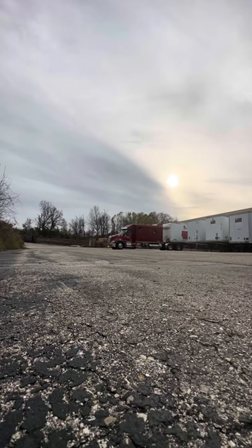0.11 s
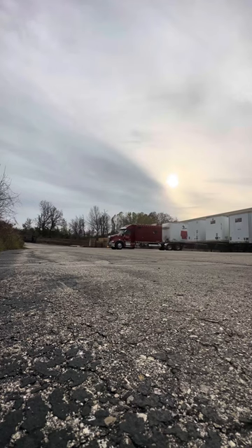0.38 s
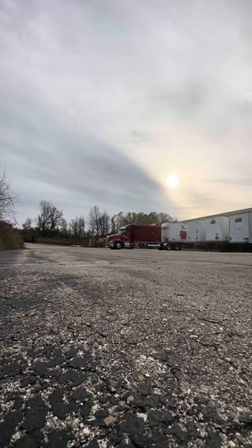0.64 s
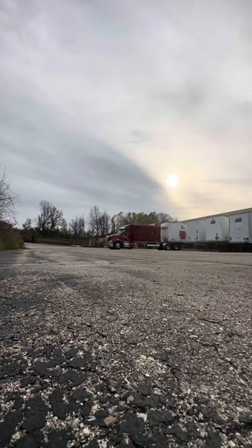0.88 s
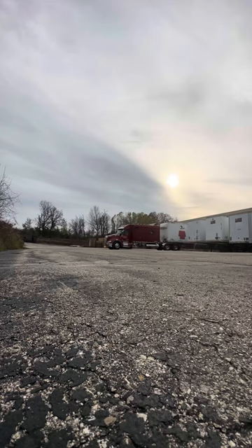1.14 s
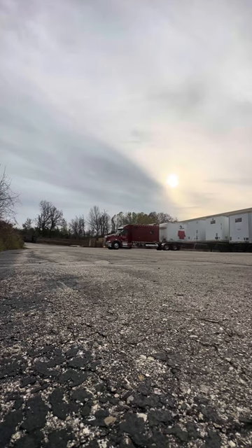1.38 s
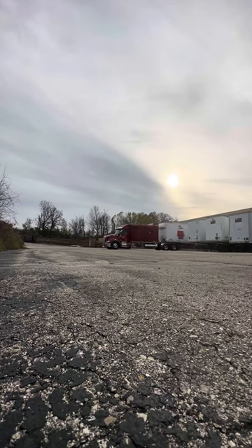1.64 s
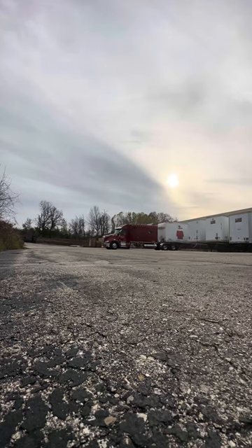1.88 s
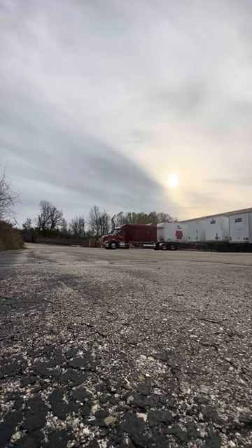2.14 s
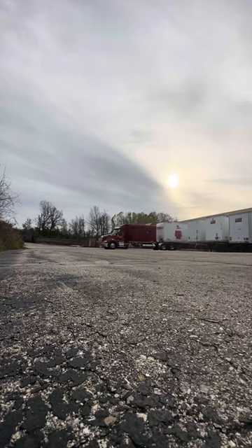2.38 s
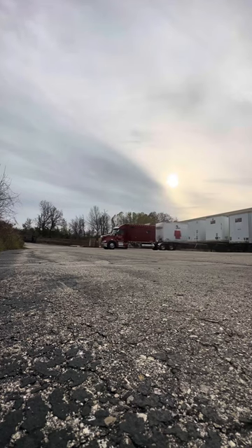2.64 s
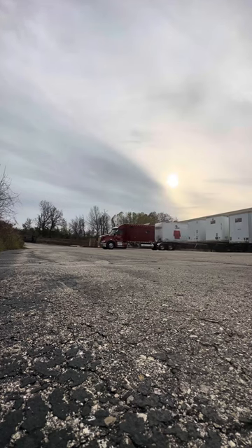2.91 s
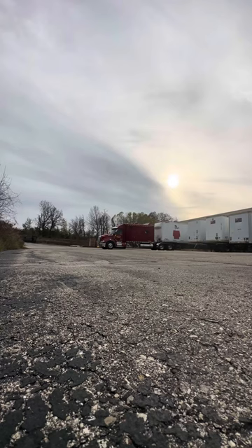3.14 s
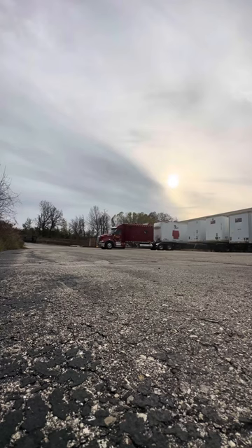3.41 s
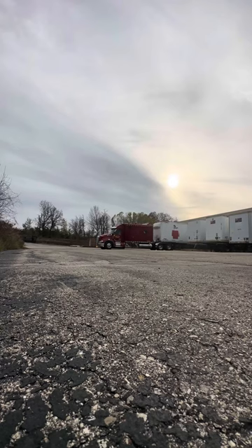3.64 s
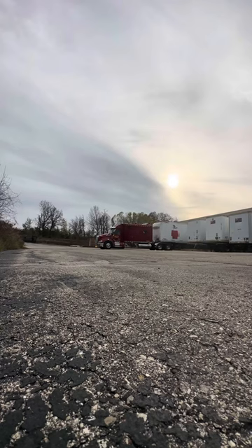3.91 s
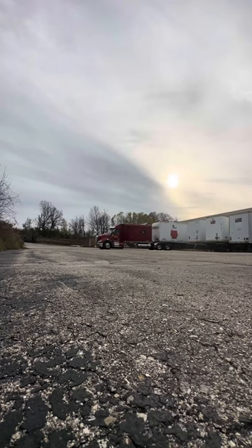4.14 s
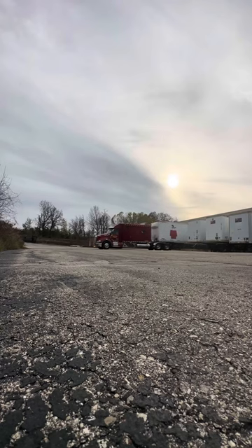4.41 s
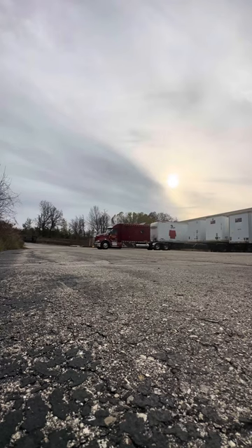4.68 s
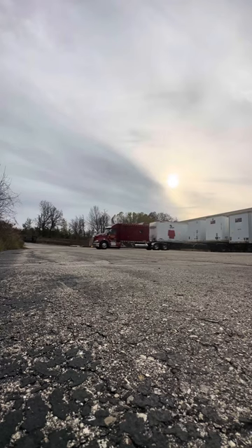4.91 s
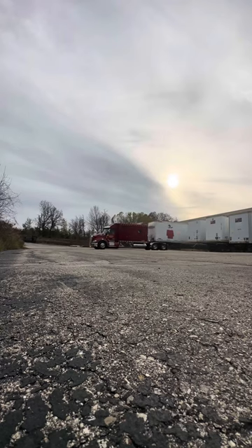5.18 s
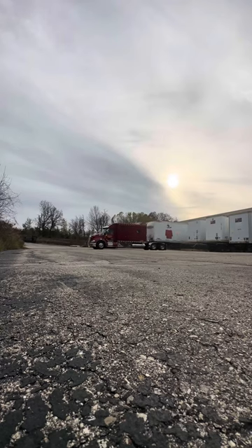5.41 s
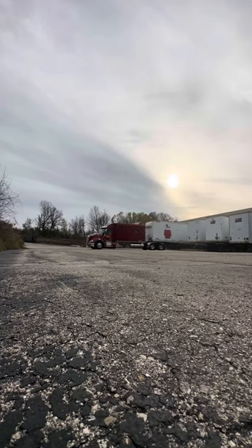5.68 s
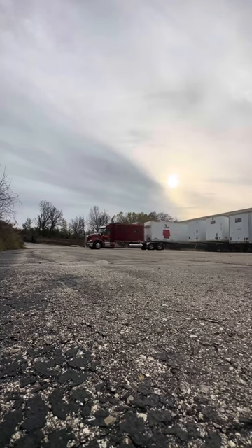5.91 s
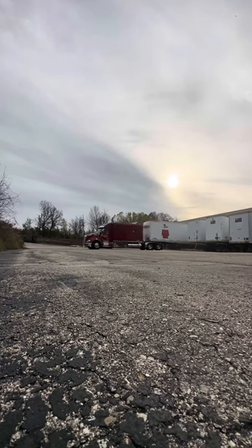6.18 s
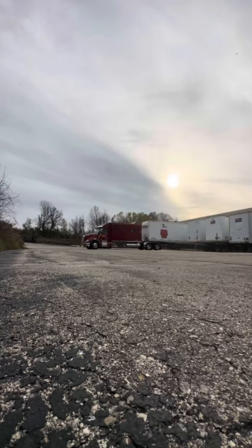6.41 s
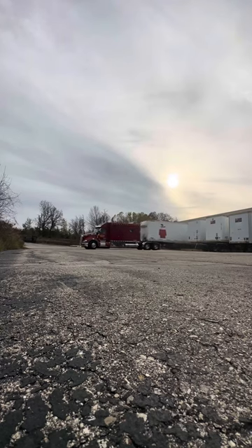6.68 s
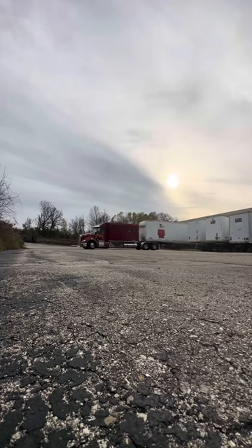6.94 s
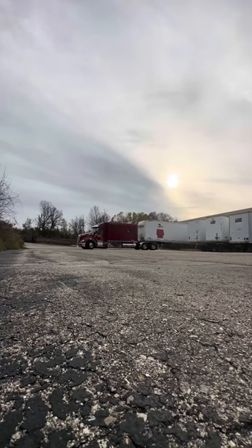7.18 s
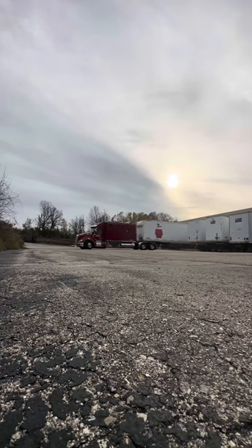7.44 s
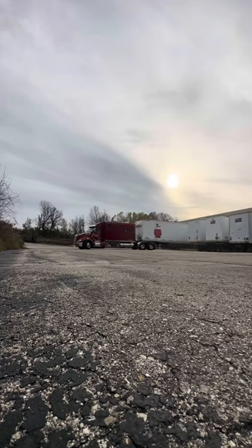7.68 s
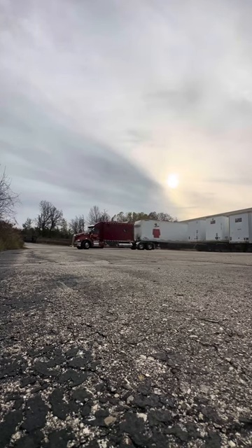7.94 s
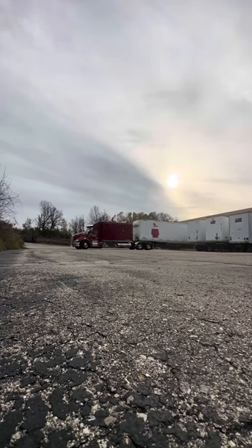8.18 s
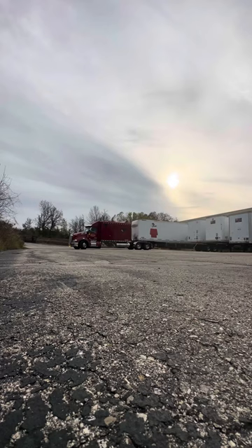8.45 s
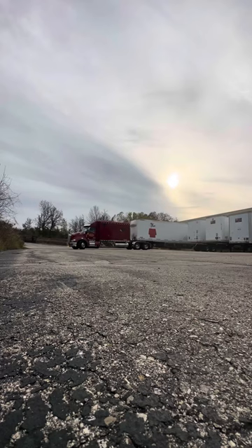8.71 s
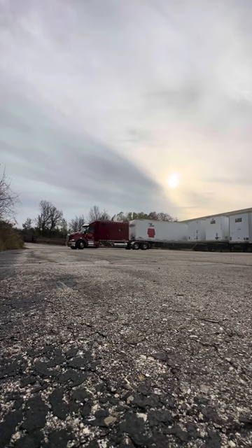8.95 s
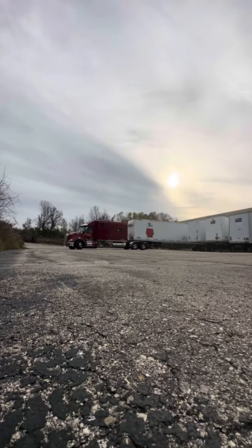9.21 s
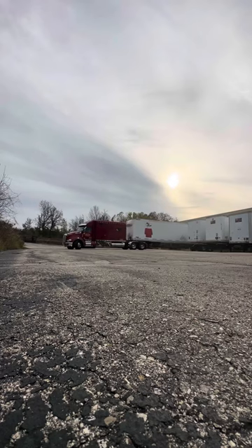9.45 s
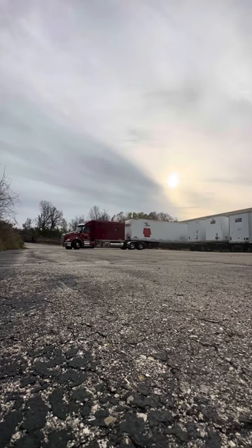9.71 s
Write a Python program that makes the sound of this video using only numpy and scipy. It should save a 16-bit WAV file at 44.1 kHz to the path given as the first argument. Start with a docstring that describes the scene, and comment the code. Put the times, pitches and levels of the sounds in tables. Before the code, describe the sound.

A continuous low diesel throb with compressor puffs, fan hum, knocking clatter and soft hiss comes from a slow truck. After a steady first half the engine lugs, revs up, eases and rises again, the roar ending louder and the clatter duller. Bright bird chips sit to the right, sliding chirps to the left, with a short wing flutter past midway. Open lot, low phone microphone.

```python
"""A deep diesel throb, a clattering engine and a broad roar that ends louder than it began: a heavy truck creeps
across a wide lot toward a phone near the ground. Small birds call from the bushes and wings flutter briefly.
One engine speed drives sines for exhaust and fan, ringing compressor puffs and the combustion knock;
the roar, clatter and hiss are shaped noise, and the birds are gliding sines with a smeared echo."""
import sys
import numpy as np
from scipy import signal
from scipy.fft import rfft, irfft, next_fast_len
from scipy.io import wavfile
from scipy.ndimage import uniform_filter1d, map_coordinates

SR = 44100
rng = np.random.default_rng(int(sys.argv[2]) if len(sys.argv) > 2 else 0)


def elevation(decibels):
    """Turn decibel levels (scalar or array-like) into linear amplitude ratios."""
    levels = np.asarray(decibels, float)
    return 10 ** (levels / 20)


def inscribe(sig):
    """Save sig as 16-bit PCM at rate SR to the path in sys.argv[1].

    A 1-D sig is mono; a 2-D sig holds one channel per row.
    Samples are clipped to [-1, 1] before scaling.
    """
    pcm = np.round(np.clip(np.atleast_2d(sig).T, -1, 1) * 32767)
    wavfile.write(sys.argv[1], SR, pcm.astype(np.int16))


N = 433503


def unit(x):
    """Normalization: scaled to rms 1."""
    return x / np.sqrt(np.mean(x ** 2) + 1e-20)


def along(points, hz):
    """Logarithmic frequency scale: columns of a table are interpolated on it."""
    f, *cols = np.transpose(points)
    return np.squeeze([np.interp(np.log(hz + 1), np.log(f + 1), c) for c in cols])


def curves(rows):
    """Linear interpolation in time: one value per sample for each column after the time."""
    s, *cols = np.transpose(rows)
    return [np.interp(np.arange(N) / SR, s, c) for c in cols]


def wobble(rate):
    """Slow random modulation: a smooth curve through rate random knots a second."""
    knots = rng.standard_normal(int(N * rate / SR) + 4)
    return map_coordinates(knots, [np.arange(N) * rate / SR])


def filtered(x, response):
    """Linear filtering: the spectrum of x times a complex response of frequency."""
    m = next_fast_len(N + SR // 2)
    return irfft(rfft(x, m) * response(np.fft.rfftfreq(m, 1 / SR)), m)[..., :N]


def lift_db(modes, hz):
    """Resonance: each mode lifts a bell-shaped peak over a spectrum."""
    return sum(db / (1 + (2 * (hz - c) / w) ** 2) for c, w, db in modes)


def rush(spectrum, patchy_db, modes=()):
    """Shaped noise: two unrelated noises of joint rms 1 that share patches of random gain."""
    z = signal.stft(rng.standard_normal((2, N)), nperseg=512)[2]
    field = uniform_filter1d(rng.standard_normal(z.shape[1:]), size=5, axis=0)
    field = uniform_filter1d(field, size=10, axis=1)
    pair = signal.istft(z * elevation(patchy_db * unit(field)), nperseg=512)[1][:, :N]
    return unit(filtered(pair, lambda hz: elevation(along(spectrum, hz) + lift_db(modes, hz))))


def orders(turns, table, waver_db):
    """Order tones: sines locked to a shaft; ground and trailer echoes make each waver on its own."""
    return sum(np.sqrt(2) * elevation(db + waver_db * wobble(6)) * np.sin(2 * np.pi * (k * turns + rng.random()))
               for k, db in table)


# Exhaust orders. Each row: multiple of the firing rate, relative level in dB.
EXHAUST_ORDERS = [(1, -23), (2, 1), (4, -10.5), (3, -5)]
# the last order booms as it crosses the stack's resonance
STACK_HZ, STACK_WIDTH_HZ, STACK_DB = 101.5, 10, 9.5
EXHAUST_DB, EXHAUST_FOLLOWS = -45.5, 1.6  # dB at idle and lowest roar; dB per dB that the roar swells
# the exhaust booms when load drags the engine down, thins when it revs free
IDLE_HZ, LUG_DB_PER_HZ = 31.9, 3.5


def exhaust(firings, firing_hz, swell_db):
    """Periodic pulsation: the exhaust sounds at multiples of the firing rate, one lifted by stack resonance."""
    stack = [(STACK_HZ, STACK_WIDTH_HZ, STACK_DB)]
    boom_db = lift_db(stack, EXHAUST_ORDERS[-1][0] * firing_hz)
    tones = orders(firings, EXHAUST_ORDERS[:-1], waver_db=1.3)
    tones += elevation(boom_db) * orders(firings, EXHAUST_ORDERS[-1:], waver_db=2)
    lug_db = LUG_DB_PER_HZ * (firing_hz - IDLE_HZ)
    return tones * elevation(EXHAUST_DB + EXHAUST_FOLLOWS * swell_db - lug_db)


# Blade tone of the fan over time. Each row: time in seconds, level in dB.
BLADE_LEVEL = [(0, -35), (.7, -40), (2.1, -35), (2.7, -42), (4.2, -40.5), (5, -44.5), (5.45, -37),
               (6.6, -38.5), (7.3, -34), (8.2, -41), (9.3, -31.5), (9.83, -40)]
# Fan harmonics. Each row: multiple of the blade rate, relative level in dB.
FAN_HARMONICS = [(1, 0), (2, -3.5), (3, -11), (4, -15), (5, -17)]
FAN_GEAR = 4.76  # blade passes per firing


def fan(firings, swell_db):
    """Blade-pass tone: a fan sounds at the rate its blades pass, with harmonics."""
    passes = FAN_GEAR * firings
    blade_db, = curves(BLADE_LEVEL)
    tones = elevation(blade_db) * orders(passes, FAN_HARMONICS[:1], waver_db=1.1)
    tones += elevation(-38.5 - .72 * swell_db) * orders(passes, FAN_HARMONICS[1:2], waver_db=1.6)
    # the upper ones firm up with load
    return tones + elevation(-39 + swell_db) * orders(passes, FAN_HARMONICS[2:], waver_db=1.8)


# Intake and tank resonances. Each row: centre in Hz, width in Hz, relative level in dB.
TANK_MODES = [(60, 15, -1.5), (112, 30, -11), (209, 22, .5), (235, 30, -.5)]
COMPRESSOR_GEAR = .4083  # piston strokes per firing
COMPRESSOR_DB, COMPRESSOR_FOLLOWS = -33, .45  # dB at the lowest roar; dB per dB that the roar swells


def compressor(firings, swell_db):
    """Impulse excitation: one puff per piston stroke rings the intake and tank."""
    strokes = COMPRESSOR_GEAR * firings + .23
    at = np.flatnonzero(np.diff(np.floor(strokes)))
    puffs = np.zeros(N)
    puffs[at] = elevation(rng.standard_normal(len(at)))  # scatter of 1 dB

    def ring(hz):
        # each resonance acts twice, so the valleys between them stay dark
        total = 0
        for k, (centre, width, db) in enumerate(TANK_MODES):
            damping = 1j * hz * width
            total = total + (-1) ** k * elevation(db) * (damping / (centre ** 2 - hz ** 2 + damping)) ** 2
        return total
    return elevation(COMPRESSOR_DB + COMPRESSOR_FOLLOWS * swell_db) * unit(filtered(puffs, ring))


def knocks(firings, firing_hz):
    """Combustion knock: one pulse per firing, uneven from cylinder to cylinder."""
    strength = rng.uniform(.7, 1.3, int(firings[-1]) + 1)[firings.astype(int)]
    pulse = np.sin(np.pi * (firings % 1) ** .62) ** 4
    depth = np.interp(firing_hz, [31, 35], [1.25, .4])  # idle knocks hardest
    return depth * strength * pulse


def knock_gate(knock):
    """Amplitude modulation: each knock lifts the noise, then it sinks; the half-second rms stays level."""
    gate = 1 + knock
    return gate / np.sqrt(np.abs(uniform_filter1d(gate ** 2, size=SR // 2)))


# Faint tones heard from the side. Each row: frequency in Hz, level in dB before the turn fades it.
DRONE_TONES = [(688, -47), (748, -49)]


def drones(turned):
    """Steady tones: two faint sines that fade as the cab turns."""
    return (1 - turned) * orders(np.arange(N) / SR, DRONE_TONES, waver_db=2.5)


# Roar spectrum. Each row: frequency in Hz, relative level in dB per Hz.
ROAR_SPECTRUM = [(15, -42.5), (30, -18.5), (50, -10), (95, -4.5), (140, -6.5), (195, -8), (270, -7),
                 (330, -8.5), (500, -11), (700, -12.5), (1000, -12.5), (1500, -17.5), (2100, -23.5),
                 (2500, -37), (4000, -120)]
# Stacks in which the roar rings, heard from the side. Each row: centre in Hz, width in Hz, lift in dB.
PIPE_MODES = [(688, 9, 7), (748, 12, 6.5), (610, 8, 5), (960, 25, 4)]
# Resonances heard from the front. Each row: centre in Hz, width in Hz, lift in dB.
GRILLE_MODES = [(312, 30, 4), (505, 50, 2), (660, 40, 2.5), (760, 25, 4), (880, 30, 2), (985, 35, 4)]


def roar(roar_db, gate, turned):
    """Resonant coloration: broad noise passes from the stacks' resonances to the front's."""
    plain = rush(ROAR_SPECTRUM, patchy_db=.78)
    side = filtered(plain, lambda hz: elevation(lift_db(PIPE_MODES, hz)))
    front = filtered(plain, lambda hz: elevation(lift_db(GRILLE_MODES, hz)))
    level = elevation(roar_db + .59 * wobble(3.2)) * gate ** .15  # a faint share of the knock
    return level * ((1 - turned) * side + turned * front)


# Clatter spectrum. Each row: frequency in Hz, relative level in dB per Hz.
CLATTER_SPECTRUM = [(300, -37.5), (500, -15.5), (800, -2), (1000, -0.5), (1100, -10), (1500, -2.5),
                    (2180, -7.5), (2330, -26), (2550, -17), (3000, -14.5), (5000, -40), (6500, -56),
                    (11000, -120)]
# Engine block and covers. Each row: centre in Hz, width in Hz, lift in dB.
BLOCK_MODES = [(686, 14, 8), (750, 30, 6), (850, 30, 4), (965, 70, 5), (1220, 60, 3), (1375, 35, 4),
               (1455, 25, 4), (1505, 25, 5), (1550, 25, 4), (1725, 30, 2), (1850, 30, 2), (2010, 30, 3),
               (2090, 60, 3), (2365, 20, 6), (2660, 60, 3), (2940, 35, 5)]


def clatter(clatter_db, gate):
    """Structural resonance: knocking noise is coloured by the engine block and covers."""
    return elevation(clatter_db) * gate * rush(CLATTER_SPECTRUM, patchy_db=.5, modes=BLOCK_MODES)


# Hiss spectrum. Each row: frequency in Hz, relative level in dB per Hz.
HISS_SPECTRUM = [(1400, -28), (2400, -3), (3100, 0), (4000, -6.5), (5000, -5), (6500, -7.5), (9500, -20.5),
                 (10500, -36), (11900, -31.5), (13400, -30), (14000, -33.5), (15700, -34.5)]


def hiss(hiss_db, gate):
    """Broadband noise: a patchy treble band pulses faintly with the knock."""
    return elevation(hiss_db) * gate ** .13 * rush(HISS_SPECTRUM, patchy_db=1.7)


# Injector spectrum. Each row: frequency in Hz, relative level in dB per Hz.
INJECTOR_SPECTRUM = [(3700, -50), (4350, -3), (4550, 0), (4750, -6), (5400, -50)]


def injectors(clatter_db, knock):
    """Gated noise: one narrow-band tick per firing, 27 dB under the clatter's level."""
    return elevation(clatter_db - 27) * unit(knock) * rush(INJECTOR_SPECTRUM, patchy_db=-4.5)


# The engine hunts at idle, sags as the clutch bites, then surges and climbs.
# Each row: time in seconds, firing rate in Hz.
ENGINE_SPEED = [(0, 31.84), (.6, 30.89), (1.2, 31.38), (1.8, 32.26), (2.3, 32.08), (2.9, 31.39),
                (3.3, 32.04), (3.9, 32.15), (4.2, 31.36), (4.6, 31.23), (5.11, 29.77), (5.62, 33.99),
                (5.96, 35.6), (6.3, 33.28), (6.64, 31.97), (6.85, 32.39), (7.3, 33.87), (7.9, 32.73),
                (8.5, 34.27), (9.15, 34.93), (9.7, 36.57), (9.83, 37.7)]
# The roar swells with load and nearness while the clatter of the turning cab sinks.
# Each row: time in seconds, then the levels of roar, clatter and hiss in dB before modulation and resonance.
NOISE_LEVELS = [(0, -29, -36, -46.5), (1, -30.5, -36, -46.5), (2.5, -30, -36.5, -48.5),
                (5.3, -30, -36.5, -47), (6.05, -27, -41, -48), (6.7, -30, -38, -49.5),
                (7.5, -27, -40.5, -48), (8.2, -27.5, -37.5, -49), (9.83, -25.5, -39.5, -48)]
# The cab swings round and other resonances face the phone: start and end in seconds.
CAB_TURN = (4.8, 6.8)


def truck():
    """Superposition: one engine phase drives all parts; the pair is direct sound and unrelated scatter."""
    firing_hz, = curves(ENGINE_SPEED)
    roar_db, clatter_db, hiss_db = curves(NOISE_LEVELS)
    swell_db = roar_db - roar_db.min()
    firings = np.cumsum(firing_hz) / SR
    turned = np.interp(np.arange(N) / SR, CAB_TURN, [0, 1])
    knock = knocks(firings, firing_hz)
    gate = knock_gate(knock)
    tones = exhaust(firings, firing_hz, swell_db) + fan(firings, swell_db)
    tones += compressor(firings, swell_db) + drones(turned)
    noise = roar(roar_db, gate, turned) + clatter(clatter_db, gate)
    noise += hiss(hiss_db, gate) + injectors(clatter_db, knock)
    return tones * [[1], [0]] + noise  # the tones are direct sound only


# The two microphone ports. Each row: frequency in Hz, left over right in dB, likeness from 0 to 1,
# phase lead of the left in radians.
PORT_RESPONSE = [(60, 2, .94, 0), (220, 2.3, .995, 0), (580, 8, .82, -.1), (850, 4.5, .9, -.55),
                 (1150, 1, .96, -.25), (1500, .2, .997, 0), (2000, .6, .99, 0), (2250, 1.4, .85, .25),
                 (2550, 1.2, .3, .6), (3000, 2.5, .55, 1.6), (3250, 3.5, .1, .5), (3600, 3, .5, -.6),
                 (4050, 1.2, .68, 0), (4700, 3.3, .25, 2.2), (5800, -1, .05, 2.6), (6700, -.4, .4, 2.6),
                 (9300, -1, .2, 3.1), (10000, 1, .75, 3.1), (11200, 0, .99, 3.14), (13500, 0, .99, 3.14),
                 (15000, 0, .7, 3.14)]


def ports(pair):
    """Interchannel coherence: the right port hears a phase-shifted share of the direct sound, plus scatter."""
    def response(hz):
        left_db, alike, lead = along(PORT_RESPONSE, hz)
        alike = np.clip(alike, 0, 1)
        right_gain = elevation(-left_db / 2)
        return np.array([elevation(left_db / 2), right_gain * alike * np.exp(-1j * lead),
                         right_gain * np.sqrt(1 - alike ** 2)])
    left, right, scattered = filtered(pair[[0, 0, 1]], response)
    return np.array([left, right + scattered])


def bird(notes, left_db, lead, overtone_db, echo_db, rough_db=1.5, flat=2, soft=.33, bright=0):
    """Frequency modulation: whistles glide and bend at both ends; bushes and trailers smear a short echo."""
    out = np.zeros((2, N + SR))
    for s, length, middle, glide, db, droop in notes:
        u = np.arange(round(length * SR)) / (length * SR)
        bend = np.abs(2 * u - 1) ** flat  # a larger power holds the middle pitch and steepens the ends
        hz = middle * (1 - droop * bend) + glide * (u - .5)
        phase = 2 * np.pi * np.cumsum(hz) / SR + np.array([[lead], [0]])
        lean = left_db(middle) / 2
        envelope = np.sin(np.pi * u) ** soft * (hz / middle) ** bright
        note = envelope * (np.sin(phase) + elevation(overtone_db) * np.sin(2 * phase))
        out[:, round(s * SR):][:, :len(u)] += elevation(db + np.array([[lean], [-lean]])) * note
    out[:, :N] *= elevation(rough_db * wobble(350))  # an unsteady syrinx and leaves roughen the whistle
    t = np.arange(SR // 4) / SR
    tail = rng.standard_normal((2, len(t))) * elevation(-60 * t / .29) * (t > .006)
    echo = signal.fftconvolve(out, tail / np.linalg.norm(tail[0]), axes=1)[:, :N + SR]
    return (out + elevation(echo_db) * echo)[:, :N]


def far_bird(notes, echo_db, **character):
    """Level and phase differences: these birds lean left, the more so above 3900 Hz."""
    lean = lambda hz: np.interp(hz, [3900, 4250], [1.5, 7])
    return bird(notes, lean, lead=-.4, overtone_db=-30, echo_db=echo_db, **character)


def drooping(notes, droop):
    """Pitch contour: the ends of each note lie under the middle by a share droop (over it if negative)."""
    return [(*note, droop) for note in notes]


def voiced(notes, droop, lower_db, upper_db):
    """Two-voiced syrinx: rows for the lower voice and, where it sings, the upper one."""
    lower, upper = [], []
    for s, length, hz, glide, db, above in notes:
        lower.append((s, length, hz, glide, db + lower_db, droop))
        if above:
            upper.append((s, length, hz + above, glide, db + upper_db, droop))
    return lower + upper


# Chips. Each row: start in seconds, length in seconds, middle pitch in Hz,
# glide from first to last pitch in Hz, level in dB before lean and roughness.
CHIP_NOTES = [(.716, 0.028, 5350, -80, -36.5), (1.525, 0.031, 5380, 10, -43), (3.27, .03, 5382, -100, -47),
              (4.203, 0.027, 5537, -30, -39.5), (4.46, 0.049, 5880, -150, -55),
              (5.735, 0.041, 5157, -260, -44), (5.77, 0.022, 4830, 52, -44), (5.85, .031, 5210, -80, -34),
              (5.938, .025, 4964, 45, -45), (6.005, 0.051, 5284, 167, -26.5), (6.6, 0.029, 5280, 118, -35),
              (6.775, .02, 5133, 103, -43), (7.24, .022, 5144, -33, -49), (7.67, .035, 5260, 38, -52),
              (8.32, 0.041, 5352, 17, -47), (8.732, 0.02, 5108, 0, -43), (9.285, 0.015, 5247, -68, -50),
              (9.452, 0.025, 5300, -200, -38.5), (9.775, 0.036, 5415, 545, -33)]


def chips():
    """Short tone bursts: soft-edged whistles of one bird to the right."""
    return bird(drooping(CHIP_NOTES, .027), lambda hz: -2.5, lead=1.7, overtone_db=-32, echo_db=-13,
                rough_db=1.7, soft=.7)


# Falling notes. Each row: start in seconds, length in seconds, middle pitch in Hz, glide in Hz,
# level in dB before lean and roughness.
FALL_NOTES = [(1.643, 0.015, 3700, -200, -45.5), (2.468, 0.038, 4100, -900, -49),
              (2.476, .022, 3740, -900, -46), (2.78, 0.029, 4290, -500, -48),
              (2.901, .034, 4270, -850, -47), (3.59, 0.014, 4950, -450, -45),
              (4.515, .042, 4400, -1300, -48), (4.605, 0.022, 3950, -410, -48),
              (5.02, 0.027, 3300, -450, -50), (5.45, .02, 4250, -600, -53),
              (6.325, 0.033, 4263, -830, -48.5), (6.455, 0.033, 4210, -760, -49),
              (8.438, .05, 4030, -1300, -47.5), (8.446, .022, 3920, -800, -52),
              (8.892, .014, 4250, -500, -51)]


def falls():
    """Downward chirps: crisp slides in pitch."""
    return far_bird(drooping(FALL_NOTES, -.013), echo_db=-6, rough_db=1.2)


# Double notes. Each row: start in seconds, length in seconds, middle pitch of the lower voice in Hz, glide in Hz,
# level in dB before voicing, lean and roughness, offset of the upper voice in Hz (0 is silent).
DOUBLE_NOTES = [(1.989, 0.059, 3900, -100, -43.5, 331), (4.111, 0.054, 4570, 150, -45, 422),
                (5.875, .043, 3870, -310, -41.5, 356), (7.85, 0.052, 3920, -500, -43, 367)]


def doubles():
    """Simultaneous tones: both halves of the syrinx sound, holding the middle pitch with steep ends."""
    return far_bird(voiced(DOUBLE_NOTES, .35, lower_db=0, upper_db=-3), echo_db=-5.5, flat=3.5)


# Pointed notes. Each row: start in seconds, length in seconds, middle pitch of the lower voice in Hz, glide in Hz,
# level in dB before voicing, lean and roughness, offset of the second voice in Hz (0 is silent).
POINTED_NOTES = [(2.058, 0.036, 3470, -150, -41, 300.5), (5.486, 0.035, 3880, -400, -46, -1),
                 (6.958, 0.057, 3450, -300, -45, 451), (7.241, .038, 4070, -300, -52, 0)]


def pointed():
    """Peaked pitch contour: nearly straight up, then straight down."""
    return far_bird(voiced(POINTED_NOTES, .18, lower_db=0, upper_db=-3), echo_db=-4.5, flat=1.3)


# Arched notes. Each row: start in seconds, length in seconds, middle pitch of the lower voice in Hz, glide in Hz,
# level in dB before voicing, lean and roughness, offset of the upper voice in Hz (0 is silent).
ARCH_NOTES = [(3.203, .078, 3500, 10, -44, 230), (4.247, 0.03, 3550, -200, -51, 0),
              (4.863, .041, 4070, 0, -41, 0), (4.908, 0.027, 3500, -50, -40.5, 0),
              (5.44, .034, 3900, 500, -47, 0), (5.466, .014, 3050, -200, -46, 0),
              (5.506, .018, 4400, 600, -49, 0), (8.882, .028, 3950, 400, -50, 0),
              (5.945, 0.035, 3350, -200, -41.5, 0), (6.728, 0.068, 3470, -50, -48, 250),
              (7.908, 0.017, 3050, 150, -48, 0), (8.09, .024, 3750, -150, -54, 0)]


def arches():
    """Parabolic pitch contour: notes bend down at both ends, some in two voices."""
    return far_bird(voiced(ARCH_NOTES, .16, lower_db=.5, upper_db=1), echo_db=-3.5)


# Rising sweeps of two trills. Each row: start in seconds, length in seconds, level in dB,
# lingering in seconds, its level in dB, both levels before lean and roughness.
TRILL_SWEEPS = [(5.309, .022, -44.5, .03, -50), (5.348, .023, -45.5, .03, -54),
                (5.399, .024, -48, .01, -58), (8.751, .022, -47, .026, -54), (8.799, .018, -47, .022, -54),
                (8.845, .021, -45, .01, -58)]


def trills():
    """Upward chirps: each sweep starts slowly, shoots up, louder on top, and lingers there."""
    notes = []
    for s, length, db, hold, hold_db in TRILL_SWEEPS:
        notes.append((s, length, 4050, 1750, db, -.09))  # middle Hz, rise Hz; ends bend upward
        notes.append((s + length, hold, 5120, 0, hold_db, 0))
    return far_bird(notes, echo_db=-3.5, bright=2)


# Wing beats. Each row: start in seconds, length in seconds, peak level in dB.
WING_BEATS = [(5.79, 0.087, -48.5), (5.883, 0.085, -48.5), (5.963, 0.059, -49.5), (6.055, 0.082, -51)]
# Feather noise. Each row: frequency in Hz, relative level in dB per Hz.
FEATHER_SPECTRUM = [(3500, -14), (5800, 8), (7800, -3), (9000, -3), (10300, 4), (11500, -33), (13000, -49)]


def wings():
    """Enveloped noise: each wing beat is a short puff of feather noise."""
    t = np.arange(N) / SR
    beats = sum(elevation(db) * np.sin(np.pi * np.clip((t - s) / length, 0, 1) ** .45)
                for s, length, db in WING_BEATS)
    return beats * rush(FEATHER_SPECTRUM, patchy_db=3)


def scene():
    """Superposition: the truck drifts 1.2 dB toward the left port; one bird is to the right, others left."""
    drift_db = 1.2 * np.linspace(-1, 1, N) / 4
    moving_truck = ports(truck()) * elevation([drift_db, -drift_db])
    birds = chips() + falls() + doubles() + pointed() + arches() + trills()
    return moving_truck + birds + wings()


def roll_off(x):
    """The treble ends steeply here."""
    return signal.sosfilt(signal.butter(12, 16920, fs=SR, output="sos"), x)


def record(dry):
    """Band limiting: the phone keeps nothing from 15760 Hz up."""
    mix = filtered(dry, lambda hz: hz < 15760)
    return roll_off(mix)


dry = scene()
out = record(dry)
inscribe(out)
```